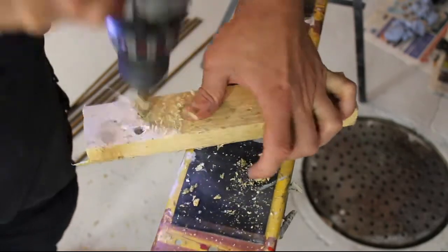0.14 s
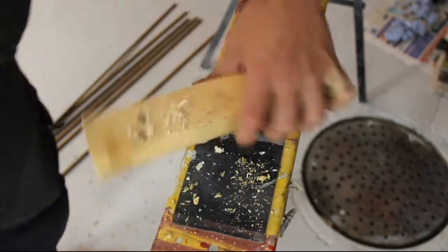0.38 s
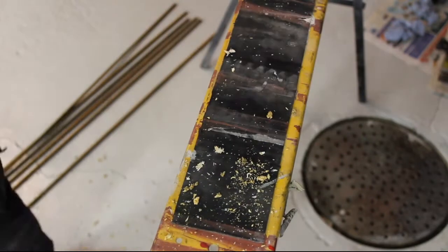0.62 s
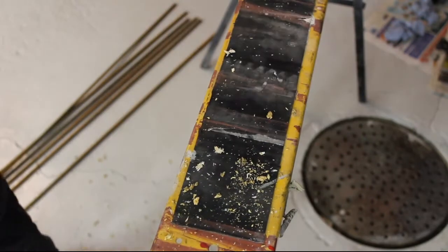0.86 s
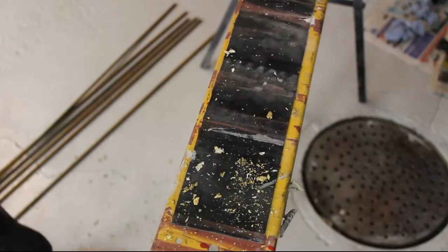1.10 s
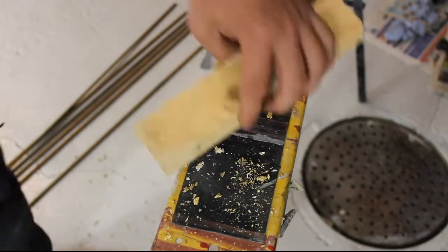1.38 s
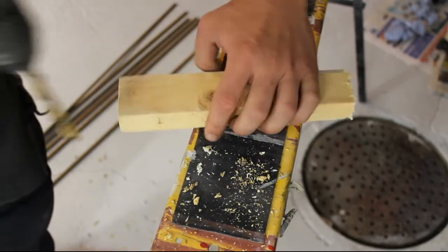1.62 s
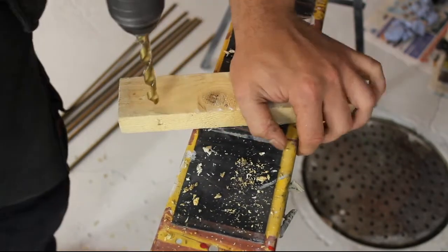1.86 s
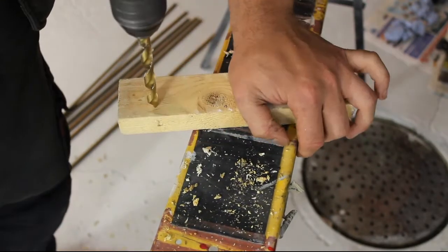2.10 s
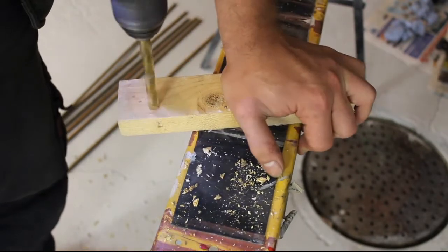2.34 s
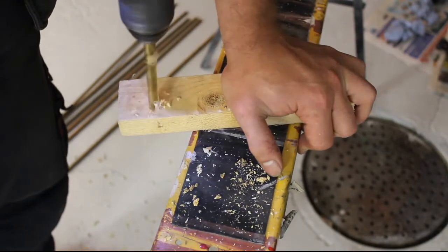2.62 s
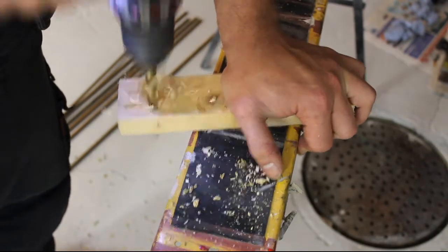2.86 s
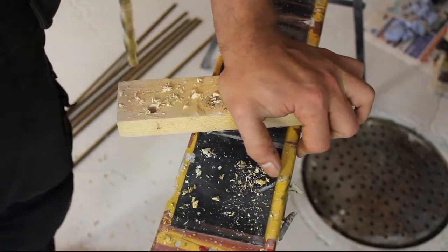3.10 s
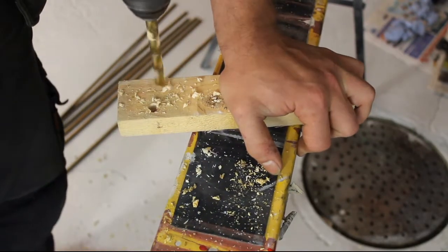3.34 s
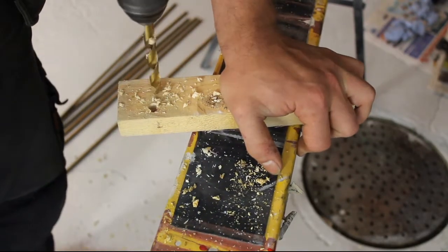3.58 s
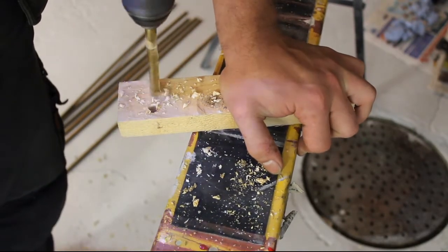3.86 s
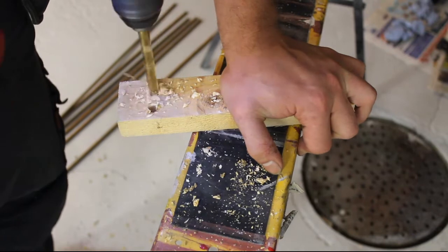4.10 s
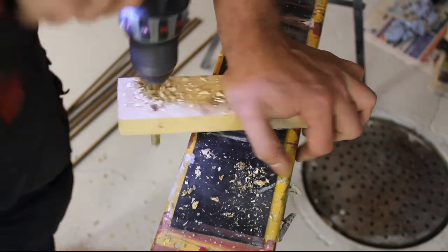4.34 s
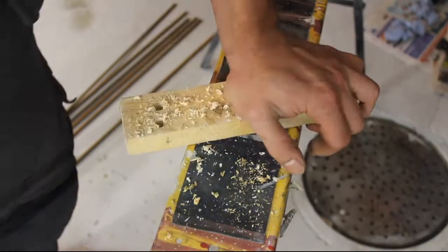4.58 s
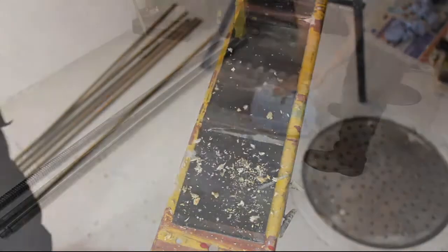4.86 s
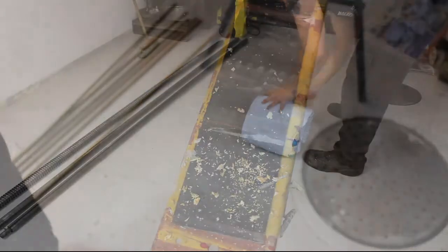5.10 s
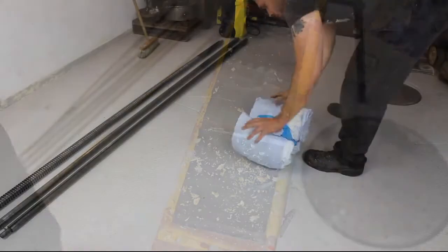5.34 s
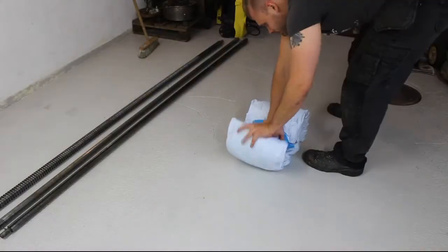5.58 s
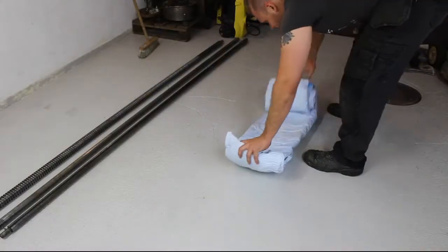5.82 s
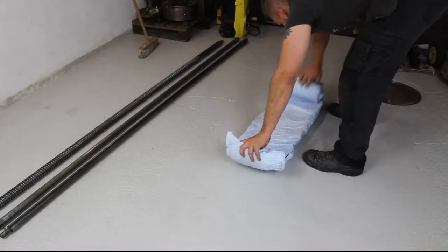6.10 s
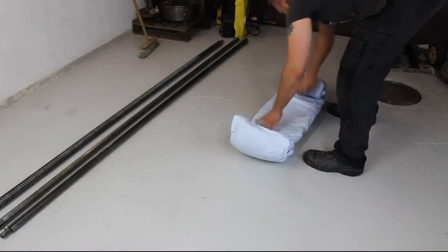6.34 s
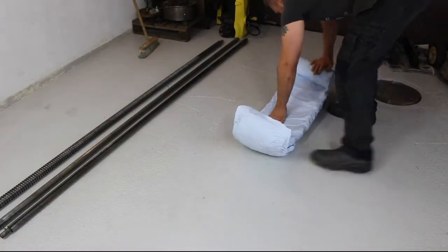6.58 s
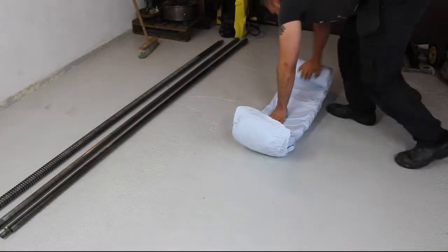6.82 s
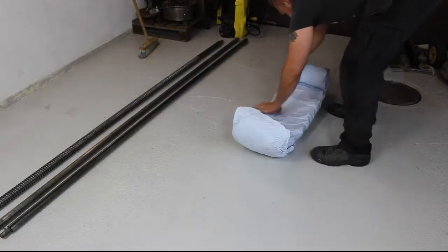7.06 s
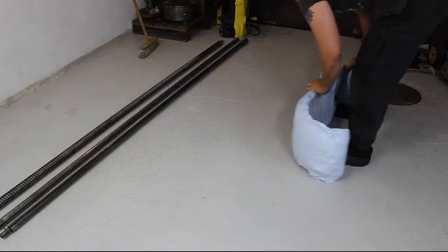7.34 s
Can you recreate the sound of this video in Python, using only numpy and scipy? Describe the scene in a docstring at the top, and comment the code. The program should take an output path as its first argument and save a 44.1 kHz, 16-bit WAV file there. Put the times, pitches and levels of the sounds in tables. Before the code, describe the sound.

A close mono microphone in a hard, bare workshop with about half a second of reverberation, over faint air and low rumble. A knock and a brush of hands open; a cordless drill spins up at once, bright and hissy, then coasts down from 0.25 s, with knocks near 0.4 and 0.55. At 0.86 s comes the loudest sound, a ringing double clank of board on steel. Hollow knocks and tiny ticks at 1.4-2.2 s set the board down. From 2.33 s the drill runs again, its whine sagging and recovering under load, winding down from about 3.1 to 3.7 s. Ticks rattle, then a third run starts at 3.85 s, bogs down near 4.1, revs up and coasts from 4.4 to 4.9 s amid knocks. From 5 s plastic sheeting crackles in irregular tugs, strongest around 5.8-6.2, 6.6 and 6.9 s, with dull floor slaps, then a last crinkle at 7.4.

```python
"""A cordless drill bores a board on a steel trestle in three short runs; the board is knocked clean and set down.
Then a bundle of plastic sheeting is unrolled over the floor of the same bare workshop.
The drill is gear-mesh orders sweeping through housing resonances, over shaped noise for brushes and bit.
Blows are rattling sets of dying sines, sheeting is clumped clicks and noise under swells, slaps are noise bursts.
Sparse decaying taps make the room; steady air, a low rumble and brushing hands lie underneath."""
import sys
import numpy as np
from scipy import signal
from scipy.fft import rfft, irfft, next_fast_len
from scipy.io import wavfile
from scipy.ndimage import uniform_filter1d

SR = 44100
rng = np.random.default_rng(int(sys.argv[2]) if len(sys.argv) > 2 else 0)


def master(y):
    """Save y as 16-bit WAV."""
    cut = np.clip(np.atleast_2d(y).T, -1, 1)
    pcm = np.round(cut * 32767)  # scale
    wavfile.write(sys.argv[1], SR, pcm.astype(np.int16))


def convert_level_to_amplitude(level_db):
    """Map a level in decibels to its linear amplitude factor."""
    exponent = np.asarray(level_db, float) / 20
    return 10 ** exponent


N = 328545
T = np.arange(N) / SR

# spectrum of creased sheeting: f/Hz, relative density/dB
FILM_SPECTRUM = [(47, -56), (80, -23.5), (119, -36), (166, -17.5), (309, -12), (346, -5.5), (493, -5),
                 (550, 0), (751, -6.5), (858, -2), (1340, -5), (3030, -6.5), (7870, -12), (13400, -11.5),
                 (16000, -13.5)]


def evened(x):
    """Scales to rms 1."""
    return x / np.sqrt(np.mean(x ** 2) + 1e-20)


def read(points, hz):
    """Reads a spectrum on a log frequency axis."""
    f, value = np.transpose(points)
    return np.interp(np.log(hz + 1), np.log(f + 1), value)


def coloured(x, points):
    """Filters by a spectrum, then scales to rms 1."""
    size = next_fast_len(N)
    gain = convert_level_to_amplitude(read(points, np.fft.rfftfreq(size, 1 / SR)))
    return evened(irfft(rfft(x, size) * gain, size)[:N])


def filtered(x, order, hz, kind):
    """Butterworth filter."""
    return signal.sosfilt(signal.butter(N=order, Wn=hz, btype=kind, fs=SR, output="sos"), x)


def grains(per_s, spread_db):
    """Random clicks, a few of them large."""
    clicks = rng.standard_normal(N) * (rng.random(N) < per_s / SR)
    return clicks * convert_level_to_amplitude(spread_db * np.minimum(rng.exponential(1, N), 4))


def swells(rows):
    """Gain of each row over time: steady climb in dB to its peak, then steady fall; 3 ms per 20 dB at fastest."""
    gains = []
    for peak_s, db, rise_s, fall_s, *_ in rows:
        before = (peak_s - T) / max(rise_s, .003)
        after = (T - peak_s) / max(fall_s, .003)
        gains.append(convert_level_to_amplitude(db - 20 * np.maximum(before, after)))
    return gains


def ring(hz, db, t60_s, rattle_s):
    """Dying sines, struck by a contact that keeps rattling faintly rather than by one clean click; peak 1."""
    t = T[:SR // 3]
    body = (convert_level_to_amplitude(db - 60 * t / t60_s) * np.sin(2 * np.pi * hz * t)).sum(0)
    chance = rng.standard_normal((2, len(t)))
    bounces = convert_level_to_amplitude(2.5 * evened(uniform_filter1d(chance[1], 200)) - 23.5 - 60 * t / 0.5)
    contact = chance[0] * (convert_level_to_amplitude(-60 * t / rattle_s) + bounces)
    sound = signal.fftconvolve(body, contact)
    return sound / abs(sound).max()


def add(mix, s, sound):
    """Mixes a sound in at time s."""
    part = mix[round(s * SR):][:len(sound)]
    part += sound[:len(part)]


def room(x):
    """Sparse random taps, each band dying at its own speed."""
    # decay: f/Hz, t60/s
    decay = [(200, 0.56), (800, .5), (3000, 0.51), (8000, 0.51), (15000, 0.32)]
    taps = np.zeros(SR)
    at = np.arange(200, SR - 20, 20)
    taps[at + rng.integers(0, 20, at.shape)] = rng.choice([-1., 1.], at.shape)
    hz, t, z = signal.stft(taps, SR, nperseg=256)
    t60_s = np.maximum(read(decay, hz), .05)[:, None]
    tail = signal.istft(z * convert_level_to_amplitude(-60 * t / t60_s), SR, nperseg=256)[1]
    return signal.fftconvolve(x, tail / np.linalg.norm(tail))[:N]


def air():
    """Steady background noise."""
    # spectrum: f/Hz, relative density/dB
    air_spectrum = [(12, -43), (20, -36.5), (81, -10), (172, -2.5), (222, -4.5), (410, 1.5), (459, -6),
                    (527, 5.5), (1440, -6), (1810, -1), (7310, -17), (14700, -18.5), (16000, -3.5)]
    return convert_level_to_amplitude(-72.5) * coloured(rng.standard_normal(N), air_spectrum)


def rumble():
    """Distant low noise of slowly changing level."""
    # course: t/s, level/dB
    rumble_course = [(0.0, -106), (0.95, -100), (1.16, -87), (1.82, -82.5), (2.14, -91), (2.6, -86),
                     (3.7, -97), (4.2, -108), (4.9, -92), (5.13, -102), (6.14, -93), (7.45, -98)]
    s, db = np.transpose(rumble_course)
    noise = coloured(rng.standard_normal(N), [(22, -13), (45, -3.5), (65, -12), (100, -37)])  # f/Hz, density/dB
    return convert_level_to_amplitude(np.interp(T, s, db)) * noise


def rustle():
    """Fine bright friction of cloth and skin: hands and sleeves brushing."""
    # strokes: peak t/s, level/dB, rise per 20 dB/s, fall per 20 dB/s
    strokes = [(0.0, -52.5, .01, 0.23), (1.25, -71.5, 0.4, 1), (1.528, -65.5, 0.9, 1), (1.876, -71, 0, -2),
               (2.234, -69, -3, -4.5), (3.67, -59, -1.3, .2), (4.89, -58, 0.6, 0.5)]
    friction = coloured(rng.standard_normal(N) + .5 * grains(800, 3.0),
                        [(2000, -16.0), (5000, -14.0), (8000, -17.0), (12000, -16), (16000, -12)])
    return sum(swells(strokes)) * friction


def slaps():
    """Sheeting and boot slap the floor: sudden dying bursts, coloured like the sheeting but duller."""
    # bursts: t/s, relative level/dB, t60/s
    bursts = [(5.171, -53, 0.091), (5.809, -35, 0.13), (6.045, -46, 0.08), (6.791, -43, 0.076),
              (6.824, -39.5, 0.15), (6.895, -34.5, 0.058)]
    # dulling: f/Hz, gain/dB
    dulling = [(47, -6), (3000, 0), (6000, -7.5), (16000, -10)]
    envelope = np.zeros(N)
    for s, db, t60_s in bursts:
        add(envelope, s, convert_level_to_amplitude(db - 60 * T[:SR // 4] / max(t60_s, .01)))
    return envelope * 0.45 * coloured(coloured(rng.standard_normal(N), FILM_SPECTRUM), dulling)


def sheet():
    """Dense creases snapping in clumps; each tug has its own share of flap and of treble."""
    # tugs: peak t/s, level/dB, rise per 20 dB/s, fall per 20 dB/s, bass re level/dB, treble re level/dB
    tugs = [(5.025, -58.5, 0.012, 0.35, -6, 0.5), (5.169, -54, 0.013, 0.19, -4, 1.5),
            (5.3, -62, 0.063, 0.31, -10, 9.5), (5.382, -49.5, 0.13, 0.13, -8, -6),
            (5.5, -60.5, 0.067, 0.25, -7, 3), (5.602, -59.5, 0.022, 0.32, -0.5, 1.5),
            (5.68, -53, 0.035, 0.69, -14, -7), (5.822, -42.5, 0.1242, 0.2, -3.5, -1),
            (5.926, -42, 0.17, 0.1, -8, -1.5), (6.051, -50.5, 0.0079, 0.1, 1, 4.5),
            (6.168, -43.5, 0.091, 0.21, -3.5, 0), (6.225, -45.5, 0.071, 0.045, -7, 1),
            (6.407, -56, 0.063, 0.21, 3, 1), (6.569, -45.5, 0.036, 0.11, -5.5, 3.5),
            (6.596, -42.5, 0.036, 0.1, -11, -0.5), (6.76, -61, 0.027, 0.89, -3, -6),
            (6.83, -51.5, 0.0078, 0.059, 4, -8), (6.88, -53, 0.019, 0.13, -6, 8),
            (6.91, -40.5, 0.04, 0.076, -3.5, 0), (7.098, -61, 0.2, .1, 6.5, 3),
            (7.156, -54.5, 0.034, 0.094, -2, -1), (7.322, -58, 0.33, 0.6, -3.5, -3.5),
            (7.388, -48.5, 0.065, 0.13, -8.5, 0)]
    power = np.array(swells(tugs)) ** 2
    level = np.sqrt(power.sum(0))
    bass, treble = np.sqrt(convert_level_to_amplitude([row[4:] for row in tugs]).T ** 2 @ power)
    clumps = convert_level_to_amplitude(0.95 * evened(uniform_filter1d(rng.standard_normal(N), 500)))
    snaps = coloured(clumps * (rng.standard_normal(N) + 0.62 * grains(1500, 4.1)), FILM_SPECTRUM)
    low = filtered(snaps, 3, 750, "low")
    mid = filtered(snaps, 3, [750, 4500], "band")
    high = filtered(snaps, 3, 4500, "high")
    return level * evened(mid) + treble * evened(high) + bass * evened(low)


def chip_ticks():
    """Small bright ticks of chips and chuck, and the trigger clicking as the drill starts: a fast-dying sine
    plus twice-differenced noise."""
    # ticks: t/s, relative level/dB, f/Hz
    ticks = [(1.3694, -60, 9200), (1.5275, -36, 10100), (1.6213, -44, 8300), (1.8036, -48.5, 11600),
             (2.0512, -59, 5550), (2.2898, -58, 8950), (2.3326, -29, 15210), (2.573, -24, 11710),
             (3.679, -42, 7850), (3.6882, -40, 9130), (3.6994, -32, 7470), (3.7064, -33, 11000),
             (3.7153, -38, 8800), (3.7233, -34, 9600), (3.8486, -28, 12700), (4.9096, -42, 12600),
             (4.922, -44, 6390), (4.9394, -42, 9250)]
    out, t = np.zeros(N), T[:2000]
    for s, db, hz in ticks:
        sound = 0.84 * np.sin(2 * np.pi * hz * t) + 0.23 * np.diff(rng.standard_normal(2002), 2)
        add(out, s, convert_level_to_amplitude(db - 60 * t / 0.0063) * sound)
    return out


def small_parts(x):
    """Small parts radiate no bass."""
    return filtered(x, 6, 330, "high")


def knocks():
    """Board and bit set down, and a ring already sounding at the very start: trestle modes ring most near each
    blow's own pitch, and a leg sways."""
    # blows: t/s, ring level/dB, strongest f/Hz, relative crack level/dB, sway level/dB
    blows = [(0.0, -47.5, 2300, -7, -76.5), (0.422, -49.5, 365, -12, -72), (0.548, -44.5, 2092, 6, -68),
             (1.45, -37, 428, 0, -72), (1.746, -40.5, 400, -24.5, -69), (1.871, -57.5, 424, 0, -76.5),
             (2.052, -49, 805, -20, -82.5), (2.182, -36.5, 840, 6.5, -94), (2.484, -39.5, 1898, 10.5, -84),
             (2.896, -38, 2300, 1.5, -78), (3.696, -63, 2070, -16, -97), (3.746, -47, 800, 6, -98),
             (3.86, -47, 1960, 5.5, -97), (4.417, -39.5, 2190, -12, -78), (4.489, -47, 514, -1, -82),
             (4.777, -61, 1519, 4, -74)]
    # trestle modes: f/Hz, level/dB
    trestle_modes = [(375, -23.5), (420, -4), (545, -7.5), (650, -1.5), (800, 3.5), (1000, 2.5),
                     (1260, -2.5), (1610, 8), (1880, 12), (2300, 13), (3650, -2), (4600, -20)]
    leg_hz, leg_t60_s = 172.8, 0.53  # lowest sway of the trestle
    hz, mode_db = np.transpose(trestle_modes)[:, :, None]
    t60_s = .018 * 1000 / hz
    out, sway, t, sway_t = np.zeros(N), np.zeros(N), T[:2000], T[:SR]
    leg = np.sin(2 * np.pi * leg_hz * sway_t) * np.minimum(sway_t / 0.023, 1)
    for s, db, centre_hz, crack_db, sway_db in blows:
        rattle_s = 0.007 * (1 + (700 / centre_hz) ** 2)  # low blows land flat and roll on
        sound = ring(hz, mode_db - 10.3 * abs(np.log2(hz / centre_hz)), t60_s, rattle_s)
        crack = uniform_filter1d(rng.standard_normal(2000), size=9) * 0.8
        sound[:2000] += convert_level_to_amplitude(crack_db - 60 * t / 0.03) * crack
        add(out, s, convert_level_to_amplitude(db) * sound)
        add(sway, s, convert_level_to_amplitude(sway_db - 60 * sway_t / leg_t60_s) * leg)
    return small_parts(out) + sway


def clanks():
    """Board struck on steel: rattling steel modes tilted by brightness, plus a noise crack."""
    # strikes: t/s, ring level/dB, brightness/(dB/octave)
    strikes = [(0.852, -22, -10.5), (0.8633, -15.5, 2), (1.158, -54, 6.5)]
    # steel modes: f/Hz, level/dB
    steel_modes = [(550, -28), (780, -28.5), (1000, -5), (1400, -10.5), (1900, -1), (2400, -14.5),
                   (2810, -7), (2900, 0), (3220, 2.5), (3310, 8.5), (3410, -3.5), (3690, -15), (4016, -14),
                   (4958, -18), (5800, -21), (7424, -17.5), (8683, -23.5), (10140, -31), (12500, -23.5),
                   (14800, -25.5)]
    hz, mode_db = np.transpose(steel_modes)[:, :, None]
    t60_s = .045 * np.minimum(hz / 2800, 1) ** 2  # wood damps the low modes
    out, t = np.zeros(N), T[:2000]
    for s, db, tilt_db in strikes:
        sound = ring(hz, mode_db + tilt_db * np.log2(hz / 3300), t60_s, 0.04)
        sound[:2000] += rng.standard_normal(2000) * convert_level_to_amplitude(3.0 * tilt_db - 17.0 - 60 * t / 0.016)
        add(out, s, convert_level_to_amplitude(db) * sound)
    return small_parts(out)


def housing(hz):
    """Gain of the drill shell at a frequency: summed resonances, nothing from 16 kHz up."""
    # resonances: f/Hz, width/Hz, level/dB
    resonances = [(700, 300, -30), (2000, 610, 2), (3430, 190, 17), (4400, 2300, -44.5), (6000, 3600, 19.5),
                  (8300, 4500, -4), (12860, 3100, 21.5)]
    gain = sum(convert_level_to_amplitude(db) / np.sqrt(1 + (2 * (hz - f) / width_hz) ** 2) for f, width_hz, db in resonances)
    return gain * (hz < 16000)


def speed():
    """Mesh frequency: the driven curve, sagging under load, then drag and friction run the rotor down."""
    # driven runs, one table each: t/s, mesh f/Hz
    driven_runs = [
        [(0.06, 2000), (0.078, 3750), (0.092, 4159), (0.118, 4638), (0.206, 5025), (0.25, 4645)],
        [(2.335, 1531), (2.365, 2746), (2.385, 3078), (2.409, 2982), (2.479, 2125), (2.529, 1585),
         (2.556, 1605), (2.57, 3313), (2.59, 4400), (2.61, 4946), (2.654, 4738), (2.746, 3316), (2.79, 3311),
         (2.83, 4366), (2.972, 4775), (3.03, 3915), (3.062, 4183)],
        [(3.85, 1733), (3.858, 1793), (3.874, 3593), (3.9, 3976), (3.996, 3049), (4.016, 3104), (4.07, 2125),
         (4.114, 3332), (4.16, 4326), (4.192, 4525), (4.252, 4460), (4.32, 4830), (4.358, 4370), (4.406, 3607),
         (4.44, 3672)],
    ]
    # coasting after each run: drag time constant/s, friction as mesh f below standstill/Hz
    coasting = [(0.66, 2160), (1.43, 7980), (0.6, 3470)]
    crawl_hz = 260.2  # the run-down eases out near here
    hz = np.zeros(N)
    for table, (drag_s, friction_hz) in zip(driven_runs, coasting):
        s, driven_hz = np.transpose(table)
        coast_hz = (driven_hz[-1] + friction_hz) * np.exp(-np.maximum(T - s[-1], 0) / drag_s) - friction_hz
        coast_hz = .5 * (coast_hz + np.sqrt(coast_hz ** 2 + (2 * crawl_hz) ** 2))
        run_hz = np.where(T < s[-1], np.interp(T, s, driven_hz), coast_hz)
        hz = np.where(T > s[0] - .02, run_hz, hz)
    return uniform_filter1d(np.maximum(hz, 50), size=220)  # rotor inertia rounds the corners


def gear_whine(mesh_hz, turns, whine_db):
    """Orders of the gear mesh waver with uneven teeth and swell through gearbox and housing."""
    # strongest orders: multiple of mesh, level/dB
    main_orders = [(1, 2), (2, -2), (3, -3), (1.5, -8)]
    # gearbox radiation: f/Hz, level/dB
    gearbox = [(450, -39), (720, -16.5), (1100, -21.5), (1550, -18), (1800, -8.5), (2200, -12),
               (2700, -17.5), (3300, -12), (3900, -15), (4450, -14), (4900, -19), (5400, -14), (6100, -5),
               (6900, -12.5), (8800, -6.5), (10000, -11.5), (12200, 0), (14500, -15), (16000, -33)]
    # other orders: multiple of mesh, relative level/dB
    other_orders = [(.5, -20), (2.5, -15), (3.5, -14), (4, -4), (5, -7), (6, -8), (7, -11)]
    coarse_t, coarse_hz = T[::64], mesh_hz[::64]
    waver = uniform_filter1d(rng.standard_normal((12, 2, len(coarse_t))), 10, axis=2) * np.sqrt(10)
    slow = uniform_filter1d(rng.standard_normal((12, len(coarse_t))), size=40, axis=1) * np.sqrt(40)
    depth = np.minimum(.4 + 0.198 * np.arange(12), 1)[:, None]  # orders come and go, the mesh tone least
    waver[:, 0] += 1.43 * slow * depth

    def tone(k, w, db):
        """One order, wavering in level and phase."""
        gain = convert_level_to_amplitude(db + np.interp(T, coarse_t, 3.13 * w[0]))
        return gain * np.cos(2 * np.pi * k * turns + np.interp(T, coarse_t, 1.2 * w[1]))

    whine = np.zeros(N)
    for (k, db), w in zip(main_orders, waver):
        whine += np.sqrt(2) * tone(k, w, whine_db + db + read(gearbox, k * mesh_hz))
    whine += 0.41 * filtered(whine, 1, [1700, 2050], "band")  # the motor can sings
    for (k, db), w in zip(other_orders, waver[4:]):
        fade = (coarse_hz / 4500) ** (1.5 if k % 1 else 1.1)  # weaker as the rotor slows, half orders most
        shell = np.interp(T, coarse_t, housing(k * coarse_hz) * fade)
        whine += shell * tone(k, w, whine_db - 17 + db)
    return whine


def brush_hiss(turns):
    """Brush and fan noise, pulsing as the brushes spark once a rotor turn (12 mesh cycles)."""
    # spectrum: f/Hz, relative density/dB
    hiss_spectrum = [(710, -40), (1200, -22), (1460, -20), (2020, -8), (2560, -10), (3550, -7.5),
                     (5180, -7), (6800, 0.5), (8000, 1.5), (9930, -0.5), (11700, 3), (15200, 2), (16000, 0)]
    sparks = 1 + 0.18 * np.cos(2 * np.pi * turns / 12)
    return coloured(rng.standard_normal(N) * sparks + 0.2 * grains(1500, 1.4), hiss_spectrum)


def bit_chatter():
    """Bit cutting wood: noise and clicks."""
    # spectrum: f/Hz, relative density/dB
    cut_spectrum = [(71, -39), (120, -21), (161, -15), (206, -17.5), (445, -0.5), (579, -6), (679, 0.5),
                    (1500, -2.5), (1950, -9.5), (3300, -120)]
    return coloured(rng.standard_normal(N) + 0.97 * grains(270, 1.3), cut_spectrum)


def trigger_whistle():
    """Trigger switching: brief high sines."""
    # whistles: start t/s, end t/s, f/Hz, level/dB
    whistles = [(2.335, 2.42, 15170, -52), (3.85, 3.896, 15170, -51), (4.02, 4.121, 15470, -50),
                (4.966, 4.997, 14800, -57)]
    out = np.zeros(N)
    for start_s, end_s, hz, db in whistles:
        t = np.arange(0, end_s - start_s, 1 / SR)
        add(out, start_s, convert_level_to_amplitude(db) * np.sin(2 * np.pi * hz * t) * signal.windows.tukey(len(t), .4))
    return out


def drill():
    """Gear whine over brush hiss and bit chatter, gated to the runs; switching whistles on top."""
    # effort, one table a run: t/s, brush and fan hiss level/dB, cutting level/dB, whine re hiss/dB
    effort = [
        [(0.058, -47, -91, -7), (0.072, -40, -80, -6), (0.092, -36, -63, -5), (0.22, -36.5, -61, -7),
         (0.334, -38, -73, 0), (0.42, -42, -75, 1), (0.54, -48, -79, 2.5), (0.568, -40.5, -77, -2.5),
         (0.85, -52, -79, -4)],
        [(2.328, -39, -59, -7), (2.348, -33, -68, -4), (2.406, -38.5, -64.5, -1), (2.534, -39.5, -62, -1.5),
         (2.578, -34, -67, -1), (2.652, -36.5, -63.5, -7), (2.77, -40.5, -63.5, 6), (2.9, -37, -61, -5.5),
         (2.99, -38, -62, -4), (3.08, -39, -64, -4), (3.3, -40.5, -86, 0.5), (3.42, -41, -88, 0.5),
         (3.574, -44, -82, -9), (3.68, -60.5, -83, 8)],
        [(3.845, -48.5, -64, -18), (3.859, -31, -61.5, -2.5), (3.943, -40, -66.5, -0.5), (4.07, -38.5, -59, -1),
         (4.165, -36, -63, -4.5), (4.23, -38, -61, 0), (4.3, -35.5, -59, -7), (4.392, -39, -65, -2),
         (4.6, -40.5, -80, -0.5), (4.786, -47, -79, -7.5), (4.92, -71, -80, 15)],
    ]
    rows = np.concatenate(effort)
    hiss_db, cut_db, whine_db = [np.interp(T, rows[:, 0], column) for column in rows[:, 1:].T]
    gate = sum((T >= run[0][0]) & (T < run[-1][0]) for run in effort) * 1.
    gate = uniform_filter1d(gate, round(0.0025 * SR))
    mesh_hz = speed()
    turns = np.cumsum(mesh_hz) / SR  # in mesh cycles
    whine = gear_whine(mesh_hz, turns, hiss_db + whine_db)
    sound = convert_level_to_amplitude(hiss_db) * brush_hiss(turns) + whine + convert_level_to_amplitude(cut_db) * bit_chatter()
    return gate * sound + trigger_whistle()


def scene():
    """Drill, ringing blows and sheeting in one hard room, on one microphone; the level dips briefly at 5.011 s."""
    tool, hits, ticks, film = drill(), clanks() + knocks(), chip_ticks(), sheet() + slaps()
    wet = room(convert_level_to_amplitude(-9.0) * (tool + .5 * ticks) + convert_level_to_amplitude(-3.5) * hits + convert_level_to_amplitude(-9.0) * film)
    near = filtered(tool + hits + ticks + film + wet, 2, 70, "high")
    mix = near + rustle() + air() + rumble()
    mix *= np.clip(abs(T - 5.011) / 0.004 - .3, .15, 1)
    return np.array([mix, mix])


def top_cut(x):
    """Nothing passes above the cut-off."""
    return signal.sosfilt(signal.butter(12, 16820, fs=SR, output="sos"), x)


def record(dry):
    """Band limit at 15.83 kHz with a linear-phase filter, then the recorder's steep cut-off."""
    edge = signal.firwin(401, 15830, window=("kaiser", 4), fs=SR)
    mix = signal.oaconvolve(dry, edge[None], "same")
    return top_cut(mix)


dry = scene()
out = record(dry)
master(out)
```